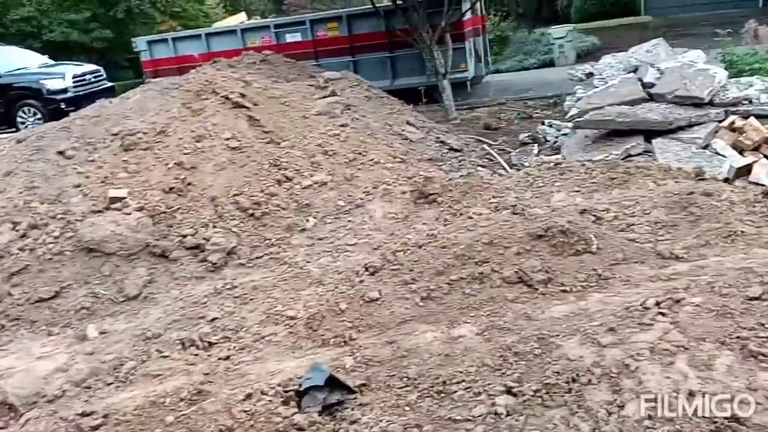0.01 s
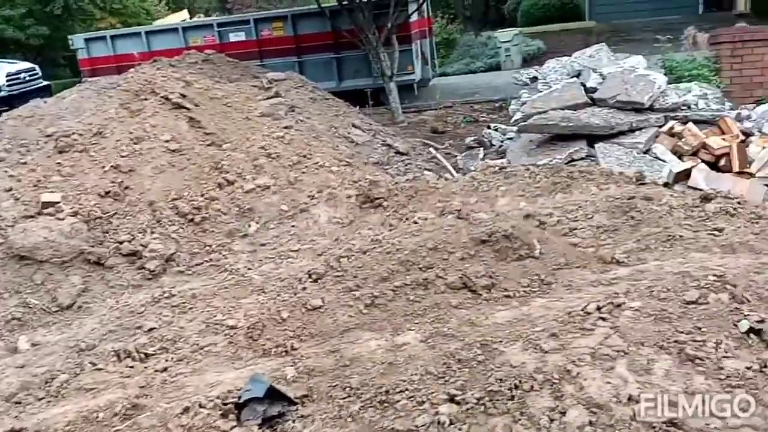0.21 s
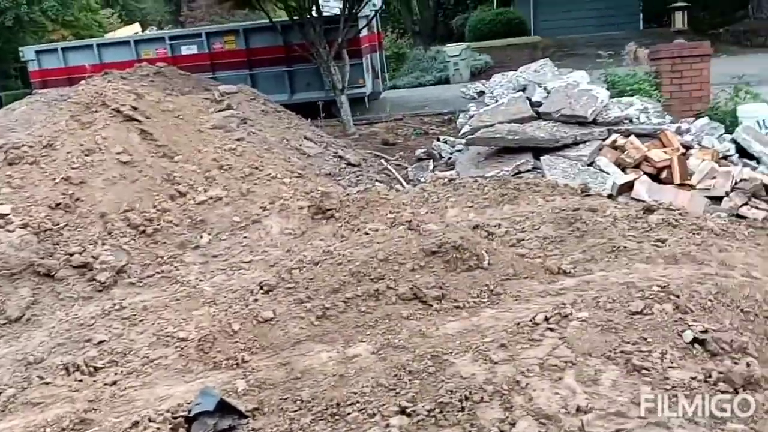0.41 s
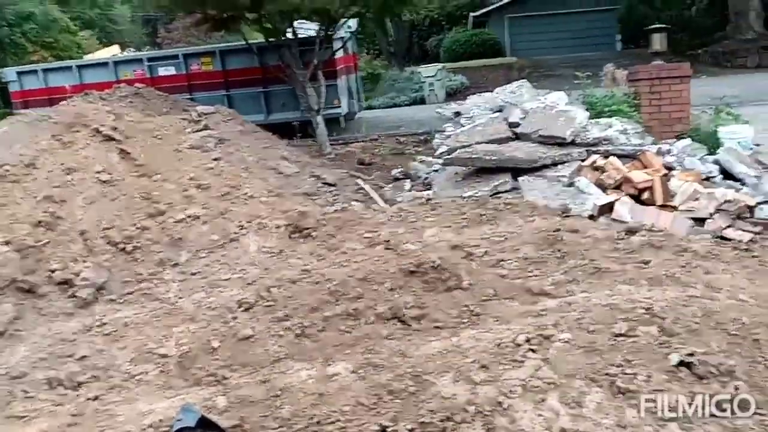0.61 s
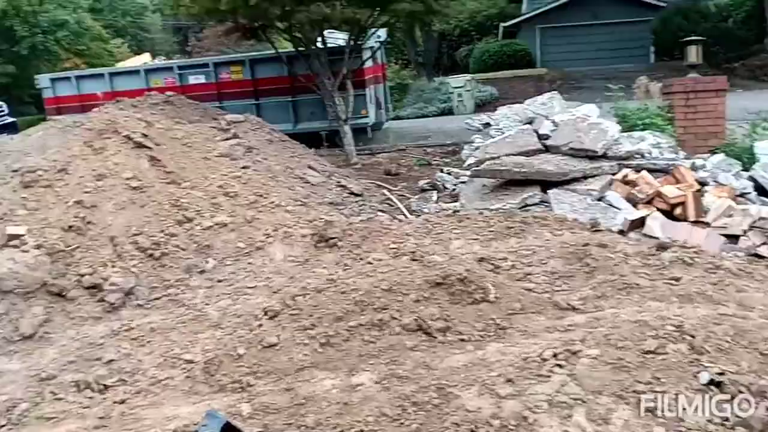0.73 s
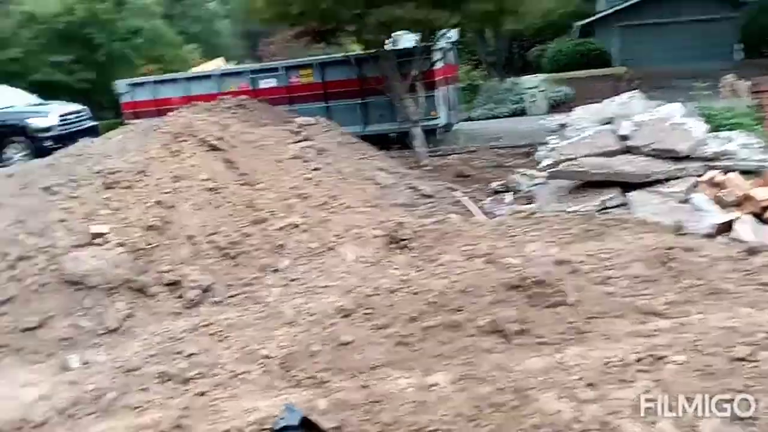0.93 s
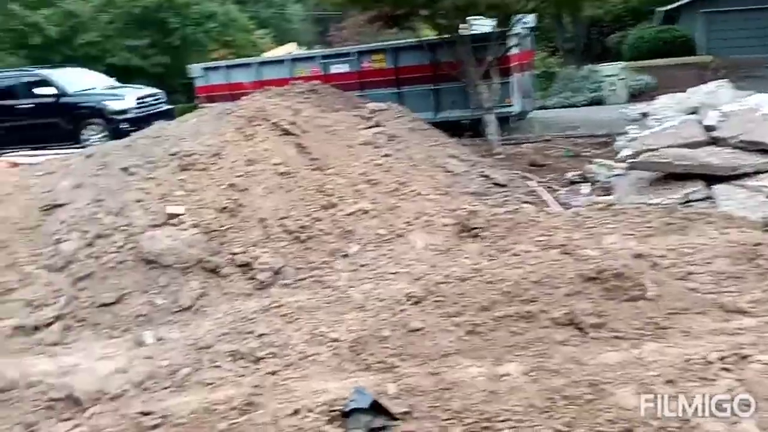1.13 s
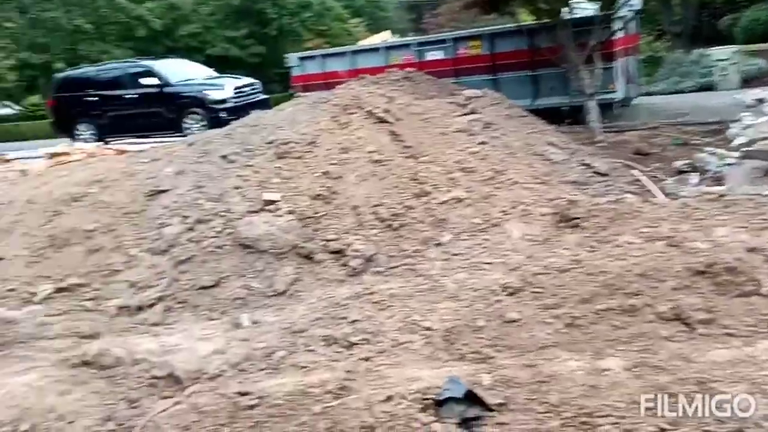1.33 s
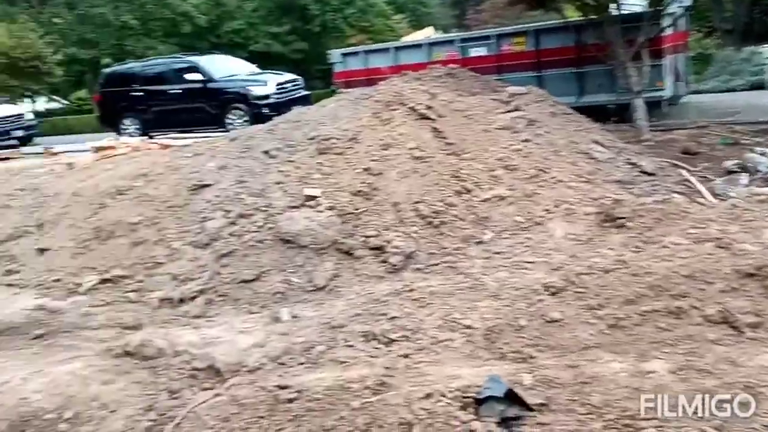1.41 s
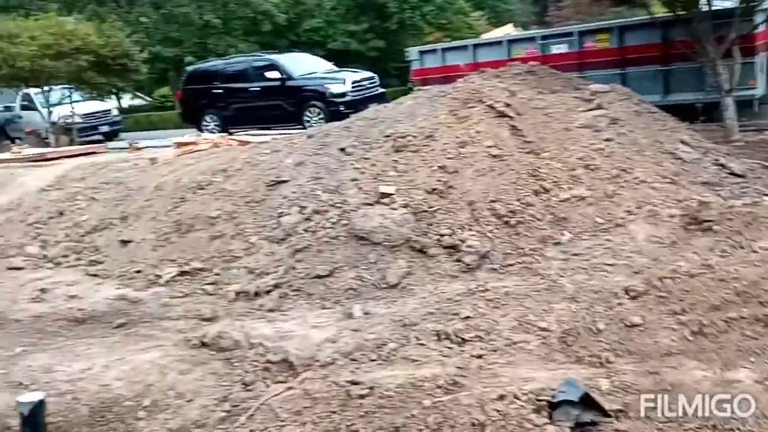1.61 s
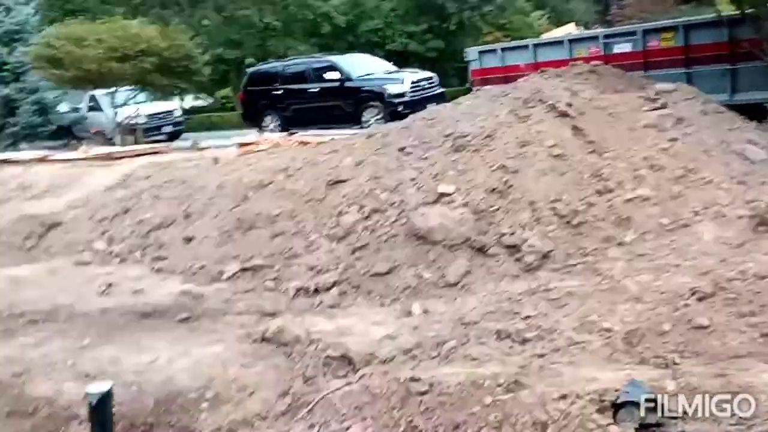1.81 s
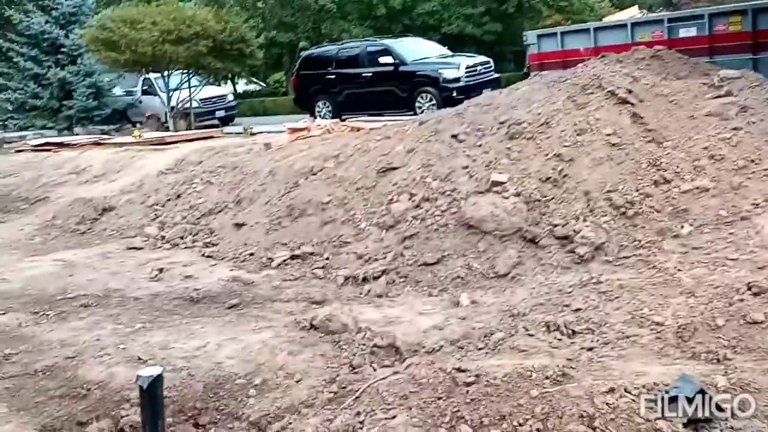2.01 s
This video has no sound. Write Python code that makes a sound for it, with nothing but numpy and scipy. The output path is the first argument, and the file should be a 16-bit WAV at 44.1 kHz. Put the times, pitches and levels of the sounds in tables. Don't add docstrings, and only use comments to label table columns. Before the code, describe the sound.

A sudden loud crash of boards, slightly to the right, cracks and rings briefly, then echoes wash off houses and trees. Later come wind thumps, a weaker knock and finger clicks on the handheld phone's case.

```python
import sys
import numpy as np
from scipy import signal
from scipy.fft import rfft, irfft
from scipy.io import wavfile
from scipy.ndimage import uniform_filter1d

SR = 44100
rng = np.random.default_rng(int(sys.argv[2]) if len(sys.argv) > 2 else 0)


def attenuation_scalar(level_db):
    decades = np.asarray(level_db, float) / 20
    return 10 ** decades


def generate_wav(sig):
    pcm = np.round(np.clip(np.atleast_2d(sig).T, -1, 1) * 32767).astype(np.int16)
    wavfile.write(sys.argv[1], SR, pcm)


N = 92610
T = np.arange(N) / SR
CRASH_S, CRASH_RISE_S = 0.2265, 0.0055
RIGHT_TO_LEFT_S = 0.000503
BANDS_HZ = 40 * 2 ** (np.arange(27) / 3)

# pitch_hz, level_db (per Hz)
TOWN_COLOUR = [(18, -73), (30, -16.5), (349, -15.5), (419, -20), (532, -22.5), (657, -19.5), (878, -15.5),
               (14800, -47), (16400, -57.5)]
# middle_s, level_db, pitch_hz, length_s, left_right_db
THUMPS = [(1.261, -35.5, 86.02, 0.025, -27), (1.284, -26, 110.6, 0.0094, -41),
          (1.297, -18.5, 105, 0.011, -37), (1.314, -22, 109.7, 0.01, -30), (1.341, -42.5, 75, 0.035, -11),
          (1.335, -46.5, 348, 0.035, -3.5), (1.287, -50, 340, .03, -5), (1.355, -47, 150, .02, -5),
          (1.455, -50, 170, .02, 0), (1.404, -45.5, 352, 0.033, -2), (1.402, -46, 113, 0.067, -5),
          (1.433, -36.5, 106, 0.014, 8), (1.482, -50, 80, 0.035, 19), (1.557, -61.5, 236, 0.053, -1),
          (1.59, -51, 340, 0.04, 2.5), (1.625, -51, 330, .025, 2), (1.51, -55, 370, .03, 0),
          (1.54, -54, 90, .07, 0), (1.702, -44.5, 98, 0.023, -25.5), (1.824, -41, 91.8, 0.028, -21),
          (.095, -40, 120, 0.022, 2), (0.07, -43, 340, .04, 1.5), (.03, -45, 325, .025, 2),
          (.035, -45, 170, .07, 2), (.1, -47, 320, .025, 2), (.148, -47, 140, .02, 0),
          (.175, -48, 340, .035, 0), (.195, -44, 150, 0.015, -6.5), (.335, -27.5, 135, 0.056, 1),
          (0.304, -25.5, 448, 0.027, -6), (0.464, -28, 108, 0.076, 0), (.51, -27, 179, 0.018, 1.5),
          (0.679, -42, 108, 0.051, 0.5), (2.004, -50, 119, 0.075, -9)]
# start_s, level_db, centre_hz, fall_60db_s, left_right_db
TICKS = [(.051, -40, 4300, 0.05, -8), (0.049, -44.5, 1830, 0.062, 5), (.052, -34.5, 6360, 0.021, 22),
         (.052, -56, 8148, 0.076, -7), (0.2089, -37, 2300, .04, 0), (0.209, -40.5, 6500, 0.085, -8.5),
         (.21, -53.5, 9830, 0.024, 4), (1.69, -44, 4300, 0.25, -37), (1.689, -48, 6100, 0.27, -36),
         (1.689, -61, 8796, 0.27, -29), (1.689, -54, 1944, 0.06, -30), (1.689, -53, 750, 0.26, 13),
         (1.876, -41, 1886, 0.041, 17.5), (1.917, -58, 7020, 0.28, -20), (1.91, -50, 2600, 0.1, 6),
         (1.725, -49, 4700, 0.19, -15), (.209, -40, 800, .04, 3), (.209, -37, 420, .05, 0),
         (.2115, -40, 5350, .035, 7), (.21, -52, 14800, .04, 0), (.225, -38, 3000, .02, 0),
         (1.866, -52, 2500, .03, 10), (1.876, -52, 6000, .08, 5), (1.902, -52, 6800, .03, -5),
         (2.04, -65, 3500, 0.29, -8), (2.075, -56, 2390, 0.25, -5), (1.92, -54.5, 920, 1, 9)]
# start_s, then a list of peak_db, pitch_hz, fall_60db_s,
# left_right_db
CLICKS = [
    (.2125, [(-32, 5350, .012, 7.5)]),
    (.0515, [(-33, 4300, .012, -5), (-31, 1900, .025, 5)]),
    (.234, [(-4, 1700, .02, 2), (-14, 4300, .012, 2)]),
    (.2382, [(-3, 1850, .014, 2)]),
    (1.6903, [(-18, 4500, 0.0026, -25)]),
    (1.755, [(-18, 4200, 0.0024, -18)]),
    (1.8727, [(6, 1400, 0.0033, 16), (-20, 1660, .014, 16), (-9, 2240, 0.0069, 21), (-10.5, 2970, 0.0042, -6), (-15.5, 4230, 0.0022, 22), (-26, 6500, 0.0048, -12), (-22, 8460, 0.004, 13)]),
    (1.9075, [(-6.5, 1730, 0.0035, 22), (-22, 2850, 0.0065, -7), (-18.5, 6850, 0.0034, -6), (-25, 8500, .0015, -5), (-18, 12000, 0.0014, -8), (-22, 15800, .0015, 0), (-24, 4500, 0.0019, 8)]),
    (1.915, [(-12, 950, 0.0047, 23)]),
    (1.931, [(-30, 2000, .004, 5)]),
]
# pitch_hz, level_db (per Hz)
CRASH_COLOUR = [(60, -34), (400, -21), (850, -29.5), (1750, -9.5), (2800, -20.5), (5800, -20.5),
                (9000, -33), (16000, -50)]
# pitch_hz, level_db, fall_60db_s
BOARD_RINGS = [(430, -13, 0.054), (1530, -8, 0.067), (1720, -1.5, 0.1), (2000, -6.5, .06),
               (2130, -11.5, 0.021), (4300, -8, .03), (5600, -11.5, .04)]
# start_s, level_db, fall_time_scale, rise_s, dulling_db (per octave from the port peak)
ECHO_WASHES = [
    (.2265, -4, 1.0, 0.014, 0.0),
    (1.7358, -33.5, 0.56, 0.00082, 10),
    (-0.09, -39.5, 0.8, .01, -0.5),
    (1.912, -44, 0.28, 0.002, 0.5),
]
# pitch_hz, level_db (per Hz)
ECHO_COLOUR = [(35, -58.5), (60, -28.5), (140, -12.5), (480, -7.5), (893, -12.5), (1850, -2.5), (2960, -16),
               (14900, -15.5), (16400, -50.5)]
# pitch_hz, fall_60db_s
ECHO_FALL = [(60, 2.2), (200, 0.87), (500, 0.99), (1000, 1.235), (1900, 1.12), (3000, 1.01), (5500, 0.82),
             (9000, 0.41), (15000, .36)]
# pitch_hz, share (0 to 1)
SHARED = [(30, 0.18), (70, 0.99), (300, 1), (1000, 0.47), (2000, 0.38), (5000, 0.37), (12000, 0.05)]
# start_s, length_s, level_db, start_hz, end_hz
CHIRPS = [
    (0.888, 0.022, -45.5, 3580, 3420),
    (.905, .06, -57, 3450, 3430),
    (1.915, 0.115, -54, 2430, 2425),
    (1.6, .04, -66, 2450, 2450),
    (1.48, .04, -68, 3950, 3850),
]
# start_s, level_db, centre_hz, fall_60db_s, left_right_db
SWELLS = [(1.39, -59, 4730, .28, 10), (1.35, -65, 3400, .4, 0), (1.29, -57, 1910, .5, 17),
          (1.3, -62, 750, 1, 0), (1.94, -66, 6200, .5, 0), (1.24, -50, 310, .5, -5),
          (1.47, -53, 330, .3, 0), (1.765, -55, 720, .2, 0), (1.87, -48, 350, .15, 5),
          (1.56, -64, 880, .5, 0)]
# pitch_hz, level_db, fall_60db_s
KNOCK_RINGS = [(1244, -52, .2), (1572, -39, .25), (1776, -46, .3), (2020, -46, .1), (2466, -45, .12)]
# pitch_hz, gain_db
PORT_COLOUR = [(6800, 1.5), (8300, -9), (9500, -3), (11400, -2), (12100, -11), (13800, -10), (15000, 7),
               (15900, -14)]
# time_s, gain_db
PHONE_GAIN = [
    (.226, 1.5),
    (.24, -7),
    (.255, -13.5),
    (.29, -8),
    (.34, -5.5),
    (.39, -4.5),
    (.45, -2),
    (.55, -2),
    (.8, -3.5),
]


def level(x, db):
    return x * attenuation_scalar(db) / np.sqrt(np.mean(x ** 2))


def read(table, hz):
    pitch, value = np.array(table)[:, 0], np.array(table)[:, 1]
    return np.interp(np.log(hz + 1), np.log(pitch), value)


def shape(x, gain):
    size = x.shape[-1]
    return irfft(rfft(x) * gain(np.fft.rfftfreq(size, 1 / SR)), size)


def walk(rate):
    hold = int(SR / rate)
    steps = np.repeat(rng.standard_normal(N // hold + 1), hold)
    return 1.274 * uniform_filter1d(uniform_filter1d(steps, hold), hold)[:N]


def strike(t, rise_s, fall_s):
    t = np.maximum(t, 0)
    return (1 - np.exp(-(t / rise_s) ** 2)) * attenuation_scalar(-60 * t / fall_s)


def panned(x, left_right_db):
    return x * attenuation_scalar(np.minimum(np.array([[left_right_db], [-left_right_db]]), 0))


def pair(share_at):
    freq = np.fft.rfftfreq(N, 1 / SR)
    share = np.clip(share_at(freq), 0, 1)
    both, left, right = rfft(rng.standard_normal((3, N)))
    lag = RIGHT_TO_LEFT_S * (1 - (1 - 0.99) / (1 + (freq / 450) ** 4))
    late = np.exp(-2j * np.pi * freq * lag)
    common = np.array([both * late, both]) * np.sqrt(share)
    return common + np.array([left, right]) * np.sqrt(1 - share), freq


def banded(colour, envelope):
    spec, freq = pair(lambda hz: read(SHARED, hz))
    spec = spec * attenuation_scalar(read(colour, freq))
    spec = spec / np.sqrt(np.mean(irfft(spec, N) ** 2))
    place = 3 * np.log2(np.maximum(freq, 1) / BANDS_HZ[0])
    out = 0
    for k, hz in enumerate(BANDS_HZ):
        band = irfft(spec * np.maximum(1 - abs(place - k), 0), N)
        out = out + band * envelope(hz)
    return out


def rings(table, age, rise_s, longest_s=np.inf):
    out = 0
    for hz, db, fall_s in table:
        out = out + attenuation_scalar(db) * np.sin(2 * np.pi * hz * age) * strike(age, rise_s, min(fall_s, longest_s))
    return out


def town():
    hum_db, rumble_db, rumble_fade_s, flicker_db = -59, -41.5, 0.22, 3
    swell = walk(3.1)

    def envelope(hz):
        rumble_band = 1 / (1 + (hz / 450) ** 4) / (1 + (120 / hz) ** 4)
        rumble = attenuation_scalar(rumble_db - hum_db) * np.exp(-T / rumble_fade_s) * rumble_band
        return attenuation_scalar(0.6 * swell + flicker_db * walk(14)) * (1 + rumble)

    return attenuation_scalar(hum_db) * banded(TOWN_COLOUR, envelope)


def air():
    noise = rng.standard_normal((3, 2, N))
    high_hiss = shape(noise[0], lambda hz: np.exp(-((hz - 15000) / 600) ** 2))
    wide_hiss = attenuation_scalar(-83.5) * shape(noise[1], lambda hz: hz < 15600)
    wind = shape(noise[2], lambda hz: (hz / 80) ** 2 / (1 + (hz / 80) ** 5))
    gusty = level(wind * attenuation_scalar(2.8 * walk(36)), -62)
    return level(high_hiss, -88) + wide_hiss + panned(gusty, -4)


def thumps():
    waver, waver_rate, sag_per_s = 0.05, 60, 1.2
    bent = T + np.cumsum(waver * walk(waver_rate)) / SR
    out = 0
    for s, db, hz, length, left_right_db in THUMPS:
        t = bent - np.interp(s, T, bent)
        cycles = hz * t * (1 - sag_per_s * t / 2)
        swell = np.exp(-(2 * (T - s) / length) ** 2)
        out = out + panned(attenuation_scalar(db) * np.cos(2 * np.pi * cycles) * swell, left_right_db)
    return out


def noisy_rings(table, rise_s):
    out, size, width = np.zeros((2, N)), 16384, 0.58
    t = np.arange(size) / SR
    for s, db, hz, fall_s, left_right_db in table:
        noise = shape(rng.standard_normal(size), lambda f: 1 / (1 + ((f - hz) / (width * hz / 2)) ** 4))
        i = int(s * SR)
        grain = level(noise, db) * strike(t + (i / SR - s), rise_s, fall_s)
        grain = panned(grain, left_right_db)[:, :N - i]
        out[:, i:i + grain.shape[1]] += grain
    return out


def ticks():
    return noisy_rings(TICKS, rise_s=0.0006)


def clicks():
    out = 0
    for s, parts in CLICKS:
        for db, hz, fall_s, left_right_db in parts:
            rise_s = min(0.0008, 2.5 / hz)
            snap = attenuation_scalar(db) * np.sin(2 * np.pi * hz * (T - s)) * strike(T - s, rise_s, fall_s)
            out = out + panned(snap, left_right_db)
    return out


def echoes():
    lump_db, lump_rate, port_peak_hz = 1.0, 130, 1560
    lumps = walk(lump_rate)

    def envelope(hz):
        power = 0
        for s, db, scale, rise_s, dull_db in ECHO_WASHES:
            dulled_db = db - dull_db * abs(np.log2(hz / port_peak_hz))
            power = power + (attenuation_scalar(dulled_db) * strike(T - s, rise_s, scale * read(ECHO_FALL, hz))) ** 2
        return attenuation_scalar(lump_db * (lumps + walk(lump_rate / 4))) * np.sqrt(power)

    return banded(ECHO_COLOUR, envelope)


def splintering():
    spec, freq = pair(lambda hz: 0.94 + 0 * hz)
    burst = level(irfft(spec * attenuation_scalar(read(CRASH_COLOUR, freq)), N), 0) * attenuation_scalar(walk(500))
    return burst * attenuation_scalar(-0.5) * strike(T - CRASH_S, CRASH_RISE_S, 0.047)


def ringing_boards():
    age = T - CRASH_S - 0.004 - np.array([[RIGHT_TO_LEFT_S], [0]])
    return attenuation_scalar(-6) * rings(BOARD_RINGS, age, CRASH_RISE_S, longest_s=0.2)


def blows():
    shade_db = -2.3 * np.array([[0], [1]])
    sound = splintering() + ringing_boards() + echoes()
    return shape(sound, lambda hz: attenuation_scalar(shade_db / (1 + (700 / (hz + 1)) ** 4)))


def chirps():
    out, wobble = 0, 1 + 0.006 * walk(90)
    for s, length, db, start_hz, end_hz in CHIRPS:
        u = np.clip((T - s) / length, 0, 1)
        cycles = np.cumsum((start_hz + (end_hz - start_hz) * u) * wobble) / SR
        out = out + attenuation_scalar(db) * np.sin(np.pi * u) ** 0.5 * np.sin(2 * np.pi * cycles)
    return panned(out, -3.5)


def distant_swells():
    return noisy_rings(SWELLS, rise_s=0.025)


def knock():
    age = T - 1.7365 - np.array([[RIGHT_TO_LEFT_S], [0]])
    return rings(KNOCK_RINGS, age, 0.001)


def scene():
    nearby = thumps() + ticks() + clicks()
    return town() + nearby + blows() + chirps() + distant_swells() + knock()


def low_pass(x):
    return signal.sosfilt(signal.butter(12, 16640, fs=SR, output="sos"), x)


def record(dry):
    at_ports = shape(dry, lambda hz: attenuation_scalar(read(PORT_COLOUR, hz)) * (hz < 16600))
    time_s, gain_db = np.array(PHONE_GAIN).T
    mix = at_ports * attenuation_scalar(np.interp(T, time_s, gain_db)) + air()
    return low_pass(mix)


dry = scene()
out = record(dry)
generate_wav(out)
```